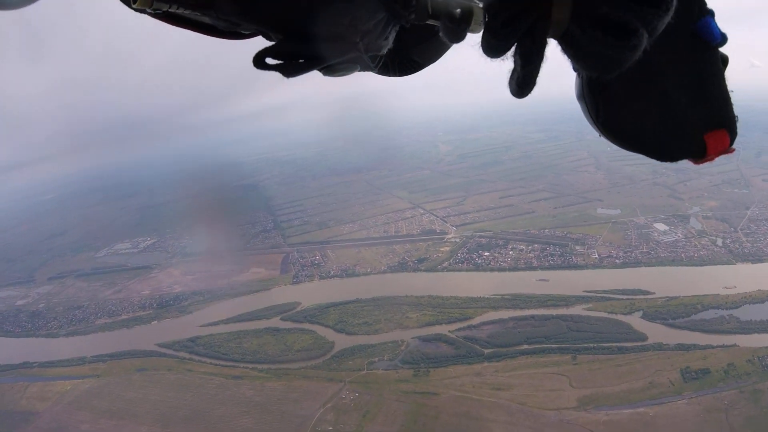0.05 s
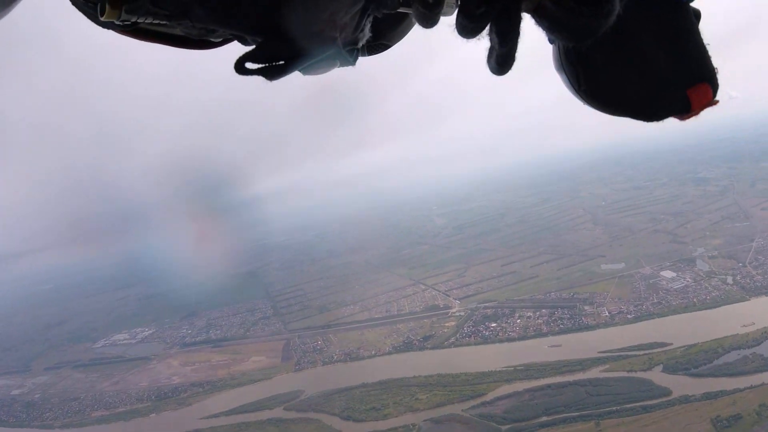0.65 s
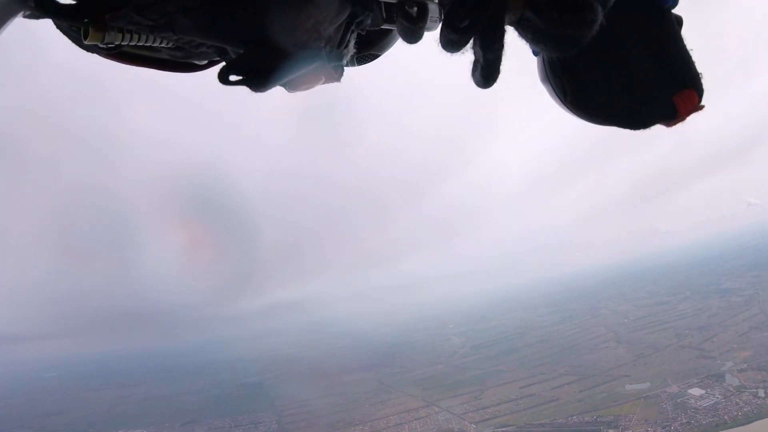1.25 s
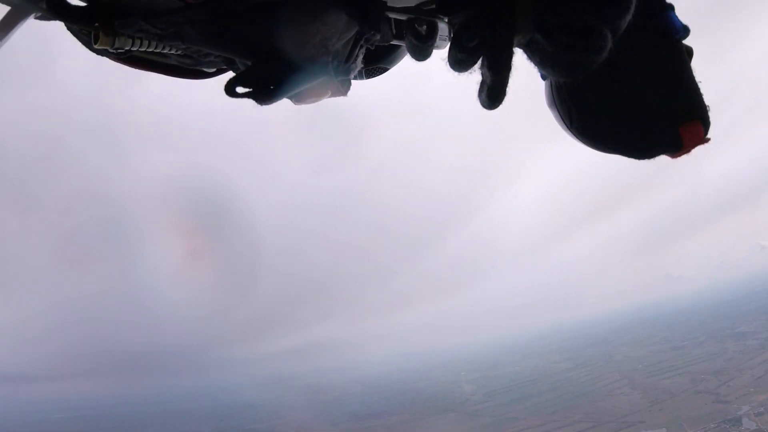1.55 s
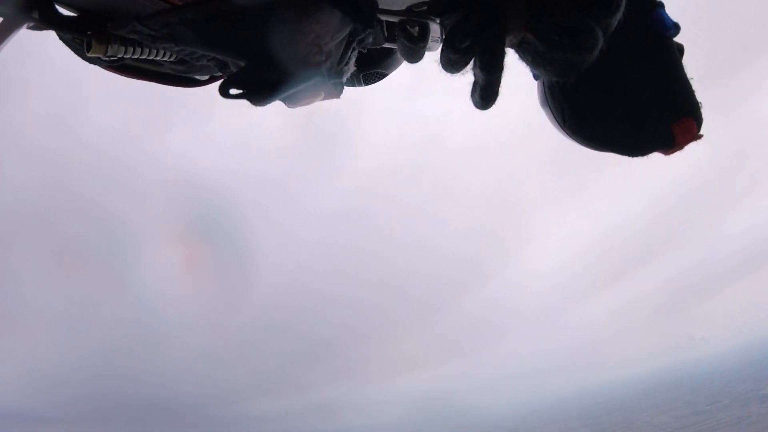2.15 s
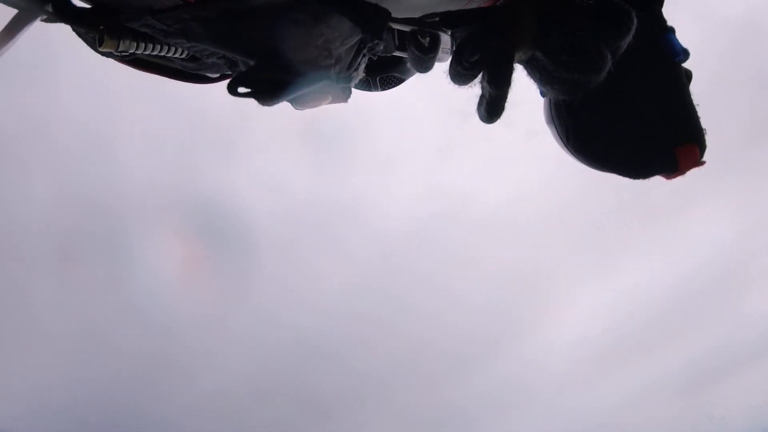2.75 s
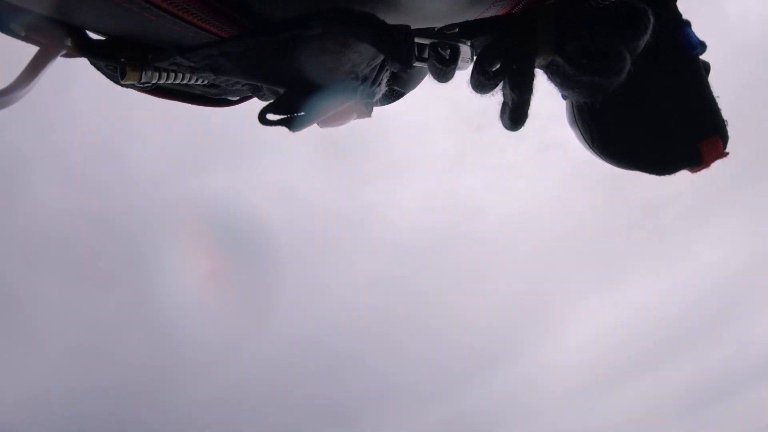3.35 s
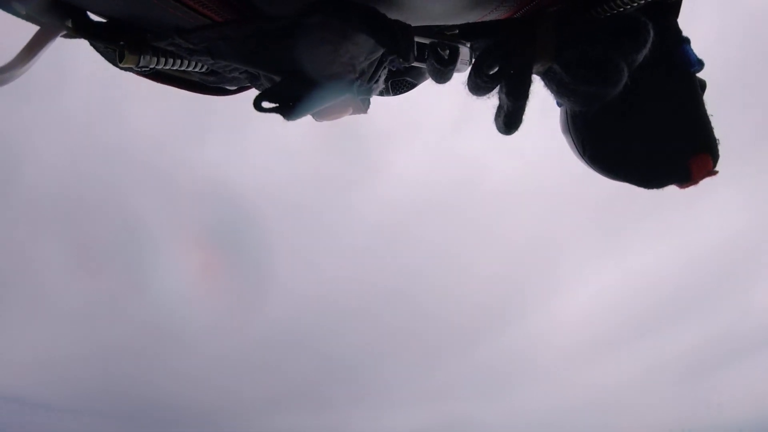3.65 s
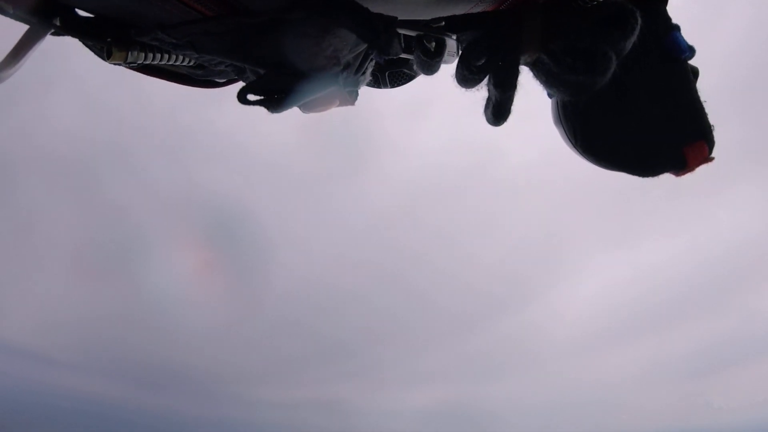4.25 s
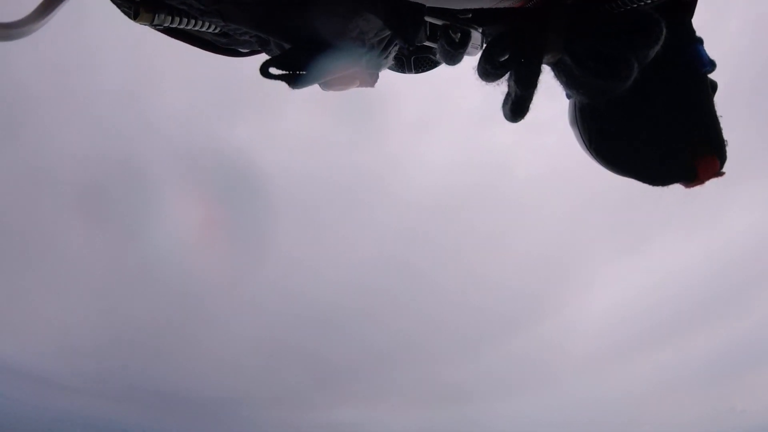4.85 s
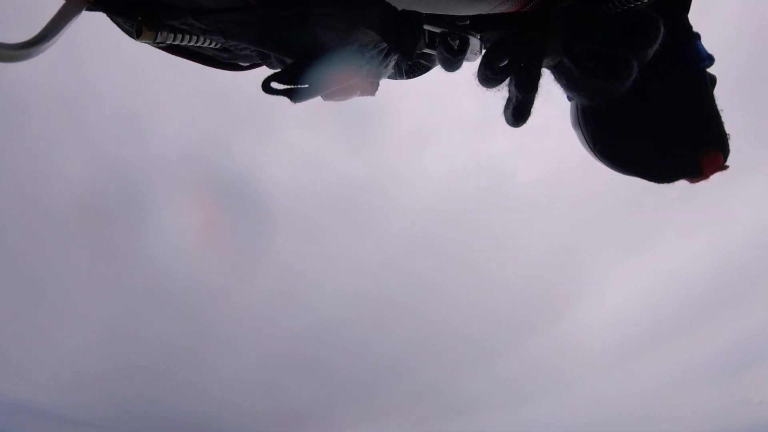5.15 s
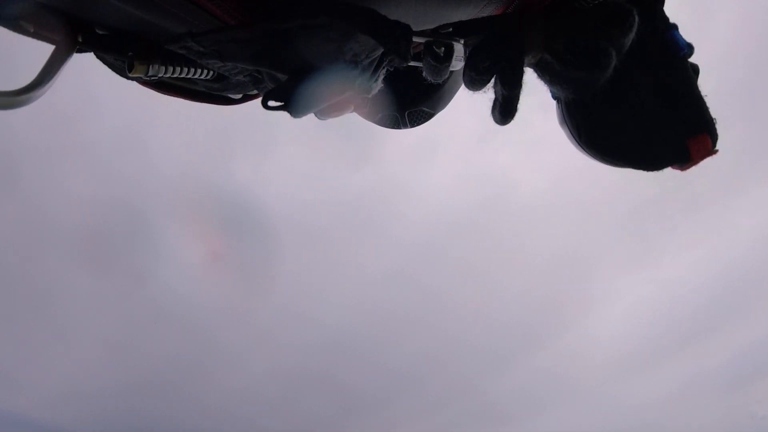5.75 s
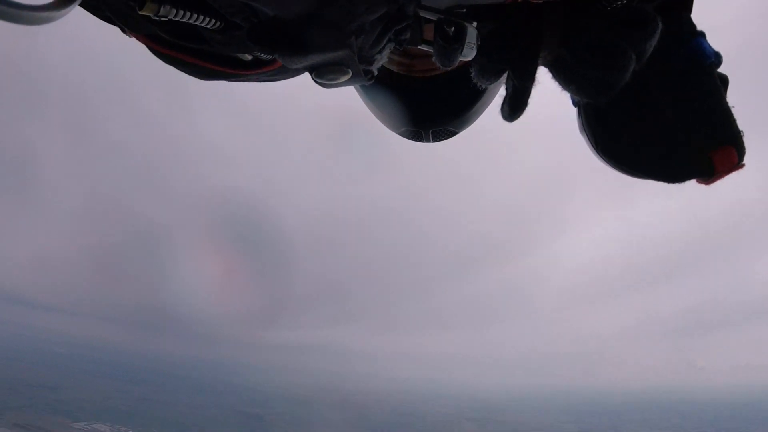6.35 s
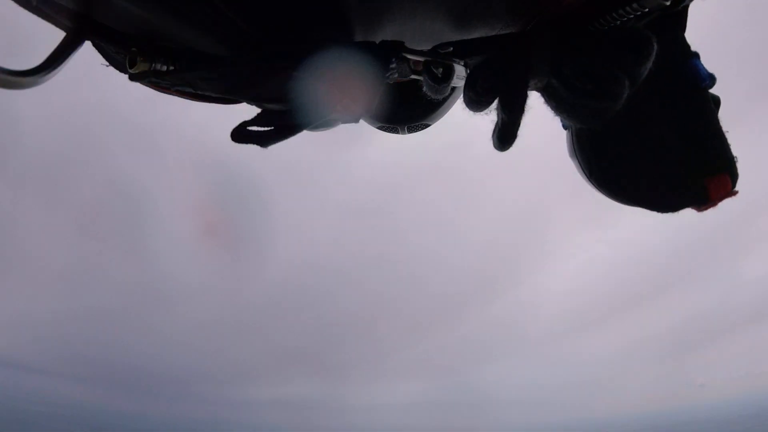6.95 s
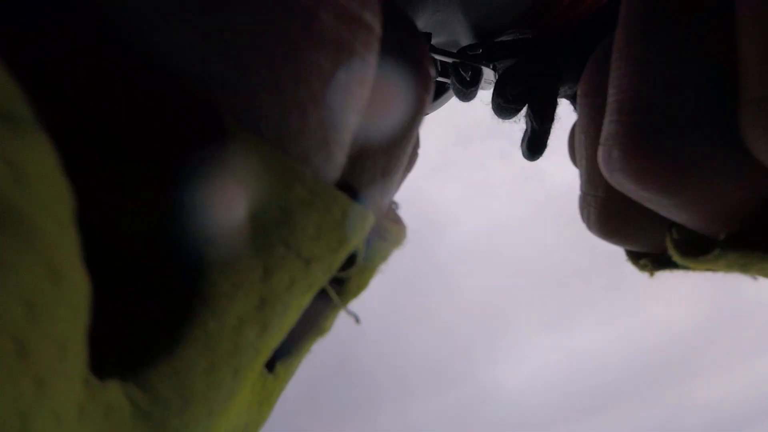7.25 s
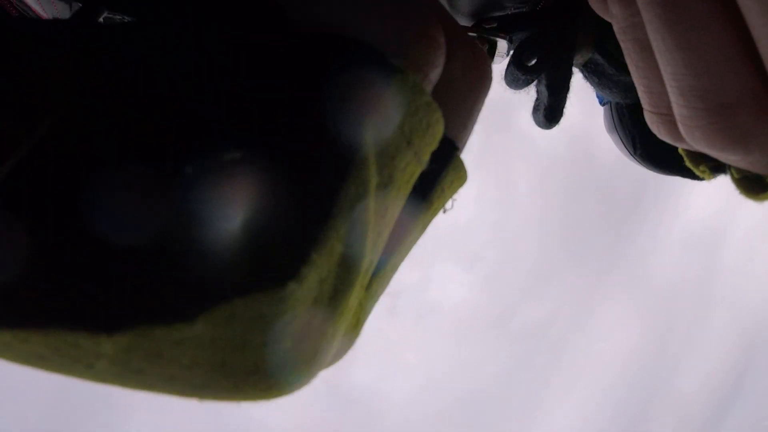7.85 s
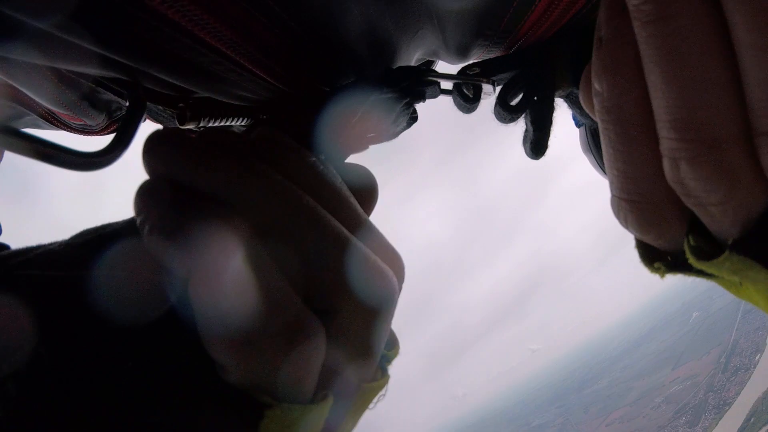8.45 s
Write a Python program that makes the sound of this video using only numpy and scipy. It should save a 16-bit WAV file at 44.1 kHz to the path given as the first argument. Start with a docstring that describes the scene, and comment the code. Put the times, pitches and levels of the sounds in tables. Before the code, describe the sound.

Loud wind pounds a small microphone worn by a skydiver high in open air. Deep, fluttering thumps run throughout beneath a rough roar and the hiss of air over the suit. Around three seconds in, the cloth snaps in a quick flurry. Near the end, hands come close and the flow breaks into uneven gusts and scuffs, with faint gear ticks and one brief rising whistle.

```python
"""High in open air, on the microphone of a small camera worn by a skydiver in fast flight.
The body's wake buffets the microphone, eddies roar over its port, air rushes over the suit and
the housing hisses. Close by, cloth snaps and loose gear ticks. Near the end the hands come
forward: the flow breaks into gusts, a gap whistles, and the port is briefly sheltered."""
import sys
import numpy as np
from scipy import signal
from scipy.fft import rfft, irfft, next_fast_len
from scipy.io import wavfile
from scipy.ndimage import uniform_filter1d, minimum_filter1d

SR = 44100
rng = np.random.default_rng(int(sys.argv[2]) if len(sys.argv) > 2 else 0)


def generate_wav(sig):
    """Save sig (samples, or channels by samples) to the path in sys.argv[1] as 16-bit PCM at SR."""
    pcm = np.round(np.clip(np.atleast_2d(sig).T, -1, 1) * 32767).astype(np.int16)
    wavfile.write(sys.argv[1], SR, pcm)


N = 380126
TIME = np.arange(N) / SR
FFT_SIZE = next_fast_len(N, True)
HZ = np.maximum(np.arange(FFT_SIZE // 2 + 1) * SR / FFT_SIZE, 1)

# Flow over suit and gear. Each row: time in seconds, level before the tilt in dB, treble tilt in dB.
SUIT_FLOW = [(0.0, -24, -10.5), (0.5, -26, -11.0), (1.1, -23.0, -12), (1.55, -26, -11.0),
             (1.95, -22, -13.5), (2.4, -27.5, -10), (2.95, -30.5, -4.5), (3.3, -26.5, -7.5),
             (3.95, -25.5, -8.5), (4.12, -30.5, -5.5), (4.35, -26, -10), (4.85, -26, -12.5),
             (5.7, -29, -14), (6.4, -26.0, -14), (6.7, -30, -11), (6.98, -21, -18), (7.1, -28, -10.5),
             (7.28, -26.5, -10)]


def from_db(db):
    """Decibels to gain."""
    return 10 ** (np.asarray(db) / 20)


def rms_one(x):
    """Scale to unit rms."""
    return x / np.sqrt(np.mean(x ** 2) + 1e-20)


def in_time(rows):
    """One control for each column after the time, its points joined by straight lines."""
    times_s, *columns = np.transpose(rows)
    return [np.interp(TIME, times_s, column) for column in columns]


def bell(peak_s, rise_s, fall_s):
    """A smooth swell from 0 to 1 and back."""
    return np.exp(-.5 * ((TIME - peak_s) / np.where(TIME < peak_s, rise_s, fall_s)) ** 2)


def colour(points):
    """Gain at every frequency from (Hz, dB) points, cut off outside them."""
    hz, db = np.transpose(points)
    return from_db(np.interp(np.log(HZ), np.log(hz), db, left=-120, right=-120))


def hump(hz, centre_hz, octaves):
    """A bell-shaped gain on the octave axis."""
    return np.exp(-.5 * (np.log2(hz / centre_hz) / octaves) ** 2)


def noise(gain):
    """Noise of the given colour, rms 1."""
    return rms_one(irfft(rfft(rng.standard_normal(FFT_SIZE)) * gain, FFT_SIZE)[:N])


def drift(below_hz):
    """A random wander, rms 1."""
    return noise(1 / (1 + (HZ / below_hz) ** 2))


def swell(wander, depth_db):
    """A fluctuating gain that keeps the mean power."""
    return rms_one(from_db(depth_db * wander))


def shelf(x, tilt_db, from_hz, to_hz):
    """A moving shelf: no change at from_hz, the full swing of tilt_db about its mean beyond to_hz."""
    share = np.clip(np.log(HZ / from_hz) / np.log(to_hz / from_hz), 0, 1)
    swing_db = tilt_db - np.mean(tilt_db)
    spectrum = rfft(x, FFT_SIZE)
    steps = np.linspace(0, 1, 4)
    weights = [np.maximum(1 - abs(share - step) / steps[1], 0) for step in steps]
    bands = [irfft(spectrum * weight, FFT_SIZE)[:N] for weight in weights]
    return sum(band * from_db(step * swing_db) for band, step in zip(bands, steps))


def evened(x, window_s, amount):
    """Even out the short-time level of x; the result has rms 1."""
    power = uniform_filter1d(x ** 2, max(int(window_s * SR), 2)) + 1e-6
    return rms_one(x / power ** (np.clip(amount, 0, 1) / 2))


def crackle(envelope, gain):
    """Short bursts of noise, heard through a resonant colour that also rounds their edges."""
    bursts = envelope * rng.standard_normal(N)
    return irfft(rfft(bursts, FFT_SIZE) * rms_one(gain), FFT_SIZE)[:N]


def buffeting():
    """Low wind buffeting thumps on the microphone, its level held even as by the camera's limiter."""
    # The body's wake. Each row: time in seconds, level before the tilt in dB, deep-bass tilt in dB.
    wake = [(0.0, -11.5, -4.5), (0.6, -14.0, -12), (1.6, -14.5, -7.5), (1.9, -12.5, -7), (2.4, -12.0, -2.5),
            (3.1, -12.0, -13), (3.6, -11.0, -12), (4.7, -12.0, -7), (5.5, -12.5, -9), (6.4, -15, -15),
            (7.1, -12, -3.0), (7.7, -16.5, -3.5), (8.1, -13.5, -3.5), (8.62, -13.5, -2)]
    # Colour of the thumps. Each row: frequency in Hz, gain in dB.
    spectrum = [(10, -8), (20, -6.5), (32, -2), (50, 0), (75, 0), (98, -2), (122, -1), (140, -6),
                (160, -17), (220, -50)]
    level_db, heave_db = in_time(wake)
    pressure = shelf(noise(colour(spectrum)), heave_db, from_hz=62, to_hz=40)
    return from_db(level_db) * evened(pressure, window_s=.045, amount=.9)


def roar(bursts, lost_db):
    """Eddies cross the microphone port in bursts; small ones make the roar brighter."""
    # Flow at the port. Each row: time in seconds, level before the tilt in dB, small-eddy tilt in dB.
    port_flow = [(0.0, -15.5, -6), (0.1, -9, -9), (0.7, -15, -7.5), (1.05, -14.5, -6.0), (1.4, -17.0, -8.5),
                 (1.85, -15.0, -7), (2.4, -19.5, -7), (3.3, -21.0, -6), (4.95, -21.5, -4.5),
                 (5.35, -18, -3), (5.85, -18, -2.5), (6.1, -12.0, -5.5), (6.7, -14.5, -6),
                 (7.0, -13.5, -5.0), (7.13, -22.5, -5.0)]
    # Colour of the roar. Each row: frequency in Hz, gain in dB.
    spectrum = [(90, -29), (150, 0.5), (200, -1), (280, -3.5), (400, -7), (600, -8.5), (850, -13),
                (1100, -22.5), (1700, -50)]
    level_db, small_db = in_time(port_flow)
    eddies = evened(noise(colour(spectrum)), window_s=0.092, amount=0.34) * swell(bursts, depth_db=0.68)
    return from_db(level_db - lost_db) * shelf(eddies, small_db, from_hz=190, to_hz=600)


def rush(bursts, lost_db):
    """Fine turbulence over suit and gear, torn by the same bursts."""
    # Colour of the rush. Each row: frequency in Hz, gain in dB.
    spectrum = [(500, -24), (800, 0.5), (1100, 1.5), (1450, -1.5), (2000, -7.5), (3000, -14.5), (4000, -21),
                (4700, -28.5), (6000, -51)]
    level_db, bright_db = in_time(SUIT_FLOW)
    turbulence = noise(colour(spectrum)) * swell(bursts, depth_db=1.0)
    return from_db(level_db - lost_db) * shelf(turbulence, bright_db, from_hz=1350, to_hz=2480)


def hiss(bursts, lost_db, pitch_over_s=2.67, dulling_db=11.5):
    """Air skims the housing; as the body pitches over, the hiss dulls and two gliding bands swell."""
    # Skimming air. Each row: time in seconds, level before the dulling in dB.
    skim = [(0.0, -41.5), (0.4, -44), (1.0, -40.5), (1.9, -38), (2.4, -40), (2.7, -37.5), (3.05, -38.5),
            (3.35, -38), (3.95, -38), (5.0, -42.0), (5.75, -47.0), (5.95, -43.5), (6.65, -42.5),
            (6.9, -39.5), (7.25, -40.5)]
    # Jet noise, lifted near 6 kHz by the cavity behind the port. Each row: frequency in Hz, gain in dB.
    spectrum = [(3800, -15), (4700, -8), (5150, -2), (5650, 3), (6800, 0), (8000, -4.5), (10000, -13.5),
                (11000, -20.5), (12000, -29), (14000, -31), (15000, -38)]
    level_db, = in_time(skim)
    pitched_over = .5 + .5 * np.tanh((TIME - pitch_over_s) / 0.41)
    jet = shelf(noise(colour(spectrum)), -dulling_db * pitched_over, from_hz=6200, to_hz=9800)
    glide = from_db(-42.5) * bell(pitch_over_s, rise_s=0.93, fall_s=0.32) * gliding_bands()
    return (from_db(level_db - lost_db) * jet + glide) * swell(bursts, depth_db=0.5)


def gliding_bands(from_hz=12000, to_hz=5690, settle_s=1.75):
    """A band of hiss and a weaker one below it glide down with the angle of flow."""
    centre_hz = to_hz + (from_hz - to_hz) * np.exp(-TIME / settle_s)
    phase = 2 * np.pi * np.cumsum(centre_hz) / SR
    upper = rms_one(noise(1 / (1 + (HZ / 750) ** 3)) * np.cos(phase))
    lower = rms_one(noise(1 / (1 + (HZ / 450) ** 3)) * np.cos(.6 * phase))
    return upper + from_db(-8.5) * lower


def fabric(decay_s=0.0017, above_flow_db=2.0):
    """The flapping suit cracks close to the microphone; small random snaps grow with the flow."""
    # Spells of flutter. Each row: peak time in seconds, most snaps a second, rise and fall in seconds.
    flutter = [(2.63, 18, .09, .2), (3.27, 170, .04, .05), (3.65, 30, .2, .35), (7.25, 25, .15, .12)]
    # Single snaps of taut cloth. Each row: start in seconds, strength in dB.
    snaps = [(2.572, -16), (3.261, -15), (3.296, -13.5), (3.327, -17), (3.364, -21), (3.401, -15),
             (3.532, -22), (3.97, -19)]
    snaps_per_s = sum(most * bell(s, rise_s, fall_s) for s, most, rise_s, fall_s in flutter)
    flow_db, _ = in_time(SUIT_FLOW)
    snapping = rng.random(N) < snaps_per_s / SR
    scatter_db = 2.8 * np.minimum(rng.exponential(1, N), 2)
    kicks = snapping * from_db(flow_db + above_flow_db + scatter_db)
    for s, db in snaps:
        kicks[round(s * SR)] += from_db(db)
    envelope = signal.lfilter([1], [1, -np.exp(-1 / (decay_s * SR))], kicks + 1e-18)
    cloth = colour([(600, -22), (1400, 5), (2200, 2), (3300, -11.5), (4600, -25), (6000, -11),
                    (8000, -23), (11500, -46)])
    return crackle(envelope, cloth)


def gusts():
    """Single large eddies hit the port and the hands scuff, each a short swell of ragged noise."""
    # Gusts and scuffs. Each row: peak time in seconds, level in dB, half length in seconds,
    # centre in Hz, spread in octaves.
    hits = [(2.612, -38.5, 0.19, 3920, 0.55), (7.073, -11, 0.0053, 760, 0.48), (7.238, -22, .008, 1500, .4),
            (7.301, -10, 0.0073, 460, 0.77), (7.368, -20, .0042, 1400, 0.82),
            (7.385, -16, 0.0099, 1380, 0.39), (7.393, -13.5, 0.035, 300, 1.23),
            (7.568, -30, .04, 1190, .25), (7.717, -12.5, 0.019, 260, 0.76), (7.73, -23.5, 0.024, 890, 0.58),
            (7.778, -25, .008, 940, 0.31), (7.812, -18, 0.01, 655, 0.27), (8.066, -19.5, 0.1, 233, 0.73),
            (8.16, -26.5, 0.07, 950, .55), (8.494, -9, 0.022, 269, 0.87), (8.501, -24, .022, 1150, 0.43),
            (8.535, -19.5, .045, 377, 0.69), (8.6, -25.5, 0.028, 1200, .45)]
    out = np.zeros(N + 2 * SR)
    from_peak_s = np.arange(SR) / SR - .5  # each peaks in the middle of a one-second window
    hz = np.arange(SR // 2 + 1) + 1
    for s, db, half_s, centre_hz, octaves in hits:
        envelope = from_db(db) / (1 + (from_peak_s / half_s) ** 2) ** 1.4
        eddy = irfft(rfft(rng.standard_normal(SR)) * hump(hz, centre_hz, octaves) / np.sqrt(hz))
        out[round(s * SR):][:SR] += envelope * rms_one(eddy)
    return out[SR // 2:][:N]


def gear_ticks(decay_s=0.002):
    """Loose hard parts tap the housing, each with a short ring and its own amount of bright click."""
    # Taps. Each row: start in seconds, strength of the ring in dB, strength of the click in dB.
    taps = [(5.8331, -34.5, -45), (6.9676, -29, -52), (7.0643, -28.5, -50), (7.1384, -34, -39),
            (7.2784, -35, -39), (7.3165, -30, -54), (7.4131, -26, -56), (7.456, -31.5, -46),
            (7.4869, -33.5, -42.5), (7.8516, -37, -48)]
    ring = click = 0
    for s, ring_db, click_db in taps:
        dying = (TIME >= s) * np.exp(-abs(TIME - s) / decay_s)
        ring += from_db(ring_db) * dying
        click += from_db(click_db) * dying
    ring_colour = colour([(3000, -18), (5600, 10.5), (8000, -13), (11000, -23)])
    click_colour = colour([(6500, -5), (9000, 6), (11000, 0), (12000, -10), (13700, -5), (14400, -25)])
    return crackle(ring, ring_colour) + crackle(click, click_colour)


def edge_tone():
    """A sharp edge of the housing sings a faint, thin, wavering note."""
    # Spells of singing. Each row: peak time in seconds, level in dB, half length in seconds.
    spells = [(6.96, -40, .055), (7.52, -52, .06), (7.88, -46, 0.027)]
    envelope = sum(from_db(db) * bell(s, half_s, half_s) for s, db, half_s in spells)
    return envelope * noise(hump(HZ, centre_hz=5730, octaves=0.017))


def hand_shelter():
    """A hand shields the port: the dB that roar, rush and hiss lose at each moment."""
    # Passes of the hand. Each row: peak time, closing and reopening in seconds, then the loss of
    # roar, rush and hiss in dB (a negative loss is a boost).
    passes = [(7.34, .025, 0.013, 3, 8, 4), (7.51, 0.055, 0.072, 8.5, 6, 4.5),
              (7.68, 0.14, 0.22, 1.5, 8, 6), (8.41, 0.15, 0.17, 2, 7.5, 1),
              (8.515, 0.023, 0.051, -5, 3.5, 5.5)]
    return sum(np.outer(lost_db, bell(s, close_s, open_s)) for s, close_s, open_s, *lost_db in passes)


def gap_whistle(start_s=7.507, start_hz=1450, rise_hz_per_s=5900):
    """A gap between hand and housing whistles once, rising unsteadily as it narrows."""
    attack_s, fade_after_s, decay_s = 0.0038, 0.033, 0.016
    age_s = np.clip(TIME - start_s, 0, 1)
    pitch_hz = (start_hz + rise_hz_per_s * age_s) * (1 + 0.04 * drift(below_hz=200))
    phase = 2 * np.pi * np.cumsum(pitch_hz) / SR
    envelope = np.minimum(age_s / attack_s, 1) * np.exp(-np.maximum(age_s - fade_after_s, 0) / decay_s)
    return from_db(-18.5) * envelope * np.sin(phase) * swell(drift(below_hz=320), depth_db=4.0)


def scene():
    """Mono, at the camera. Roar, rush and hiss share fast bursts that partly follow the wake."""
    wake = buffeting()
    bursts = rms_one(drift(below_hz=50) + 1.05 * drift(below_hz=14) + rms_one(wake))
    roar_lost_db, rush_lost_db, hiss_lost_db = hand_shelter()
    air = wake + roar(bursts, roar_lost_db) + rush(bursts, rush_lost_db) + hiss(bursts, hiss_lost_db)
    return (air + fabric() + gear_ticks() + gusts() + gap_whistle() + edge_tone())[None]


def limiter(x, ceiling_db, release_db_per_s):
    """Gain drops just ahead of each peak and recovers steadily."""
    over_db = np.maximum(20 * np.log10(abs(x) + 1e-9) - ceiling_db, 0)
    recovery_db = release_db_per_s * TIME
    held_db = np.maximum.accumulate(over_db + recovery_db, axis=-1) - recovery_db
    gain_db = uniform_filter1d(minimum_filter1d(-held_db, size=89), size=89)  # eased over 2 ms
    return x * from_db(gain_db)


def record(dry):
    """The camera limits the peaks and cuts the top above 15 kHz."""
    limited = limiter(dry, ceiling_db=-1.0, release_db_per_s=87)
    return signal.sosfilt(signal.cheby1(12, .2, 15000, fs=SR, output="sos"), limited)


dry = scene()
out = record(dry)
generate_wav(out)
```